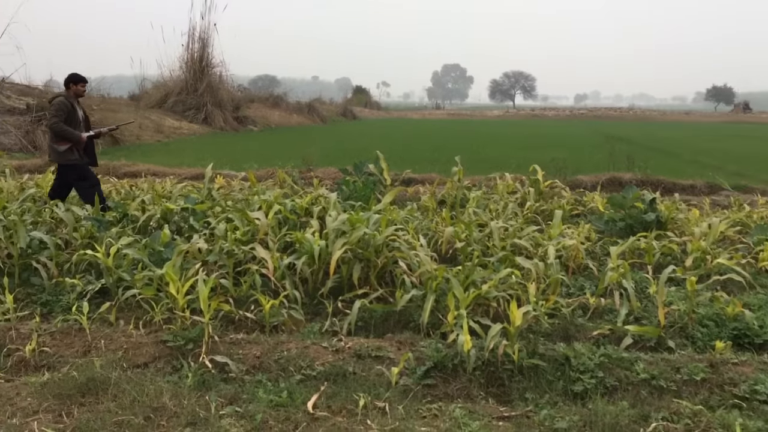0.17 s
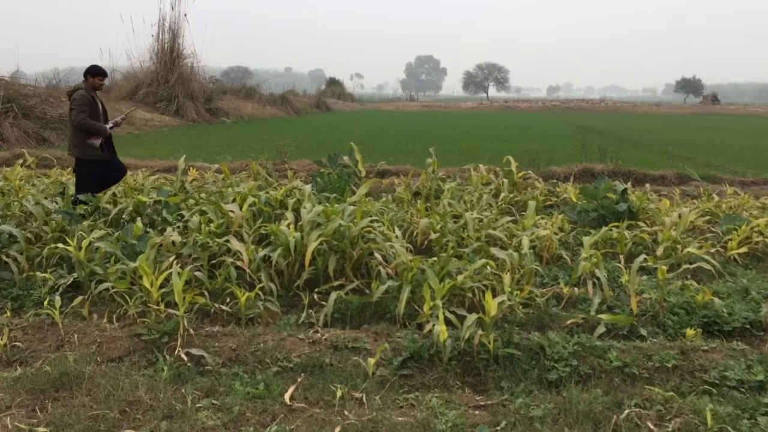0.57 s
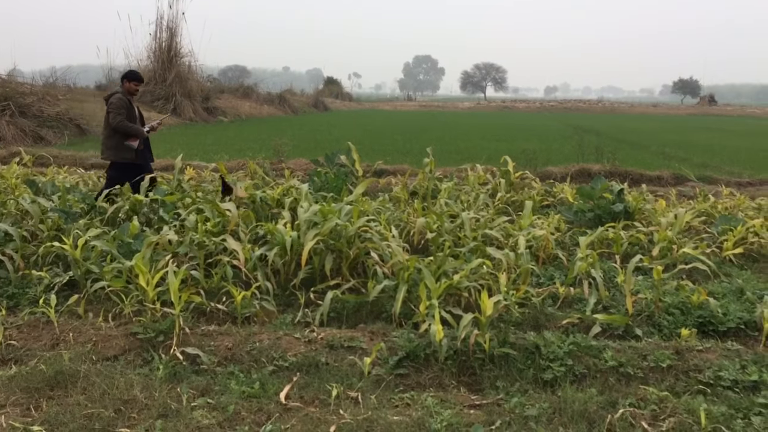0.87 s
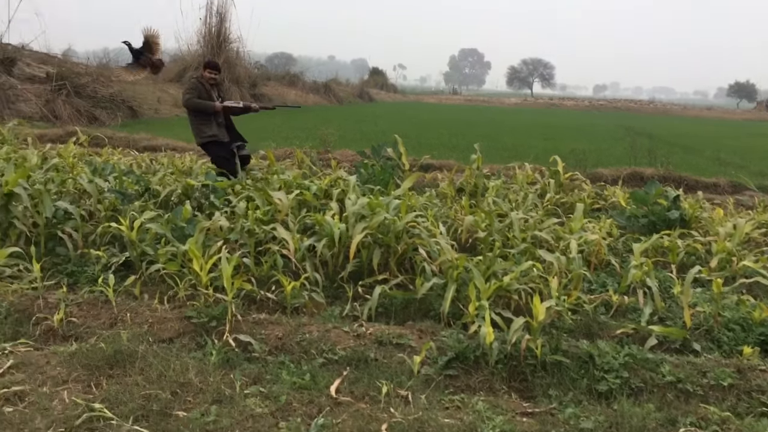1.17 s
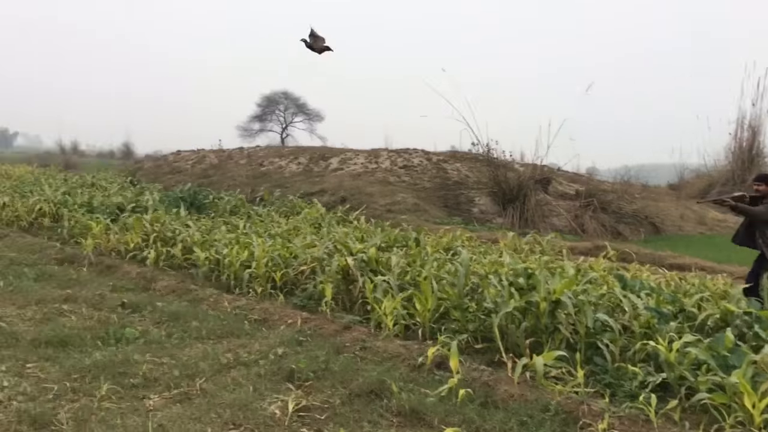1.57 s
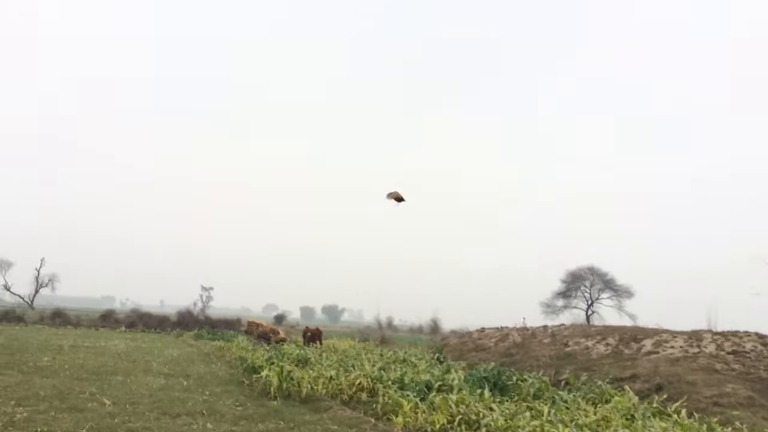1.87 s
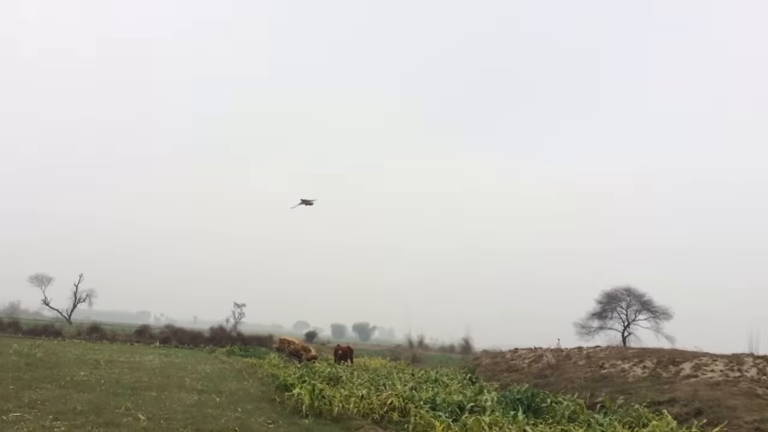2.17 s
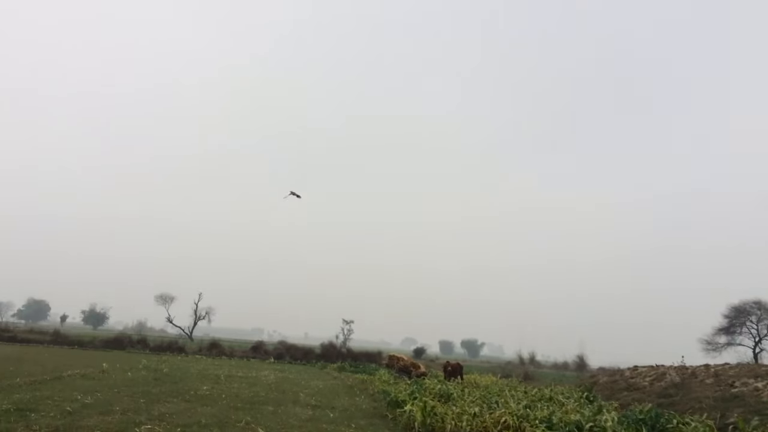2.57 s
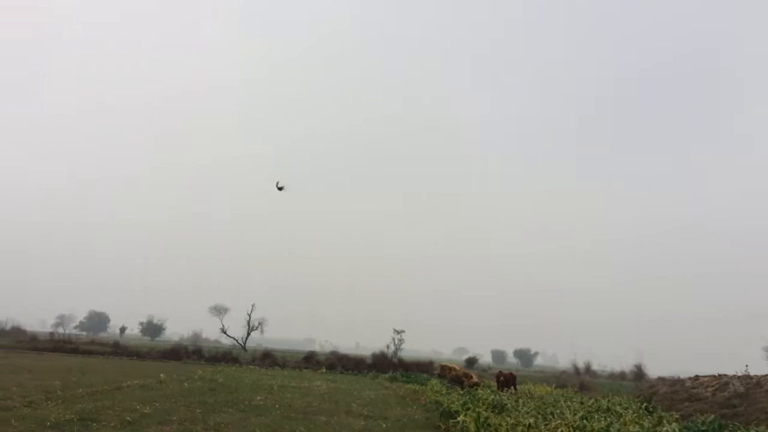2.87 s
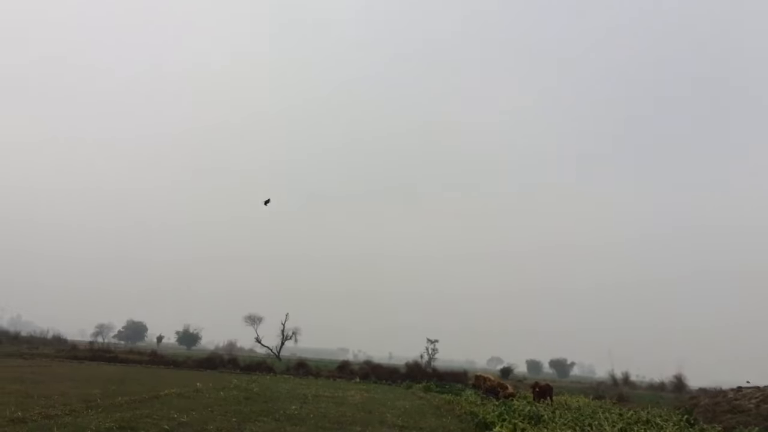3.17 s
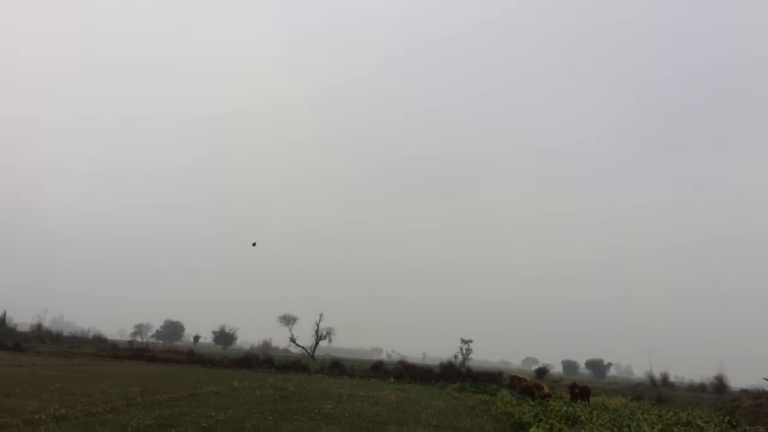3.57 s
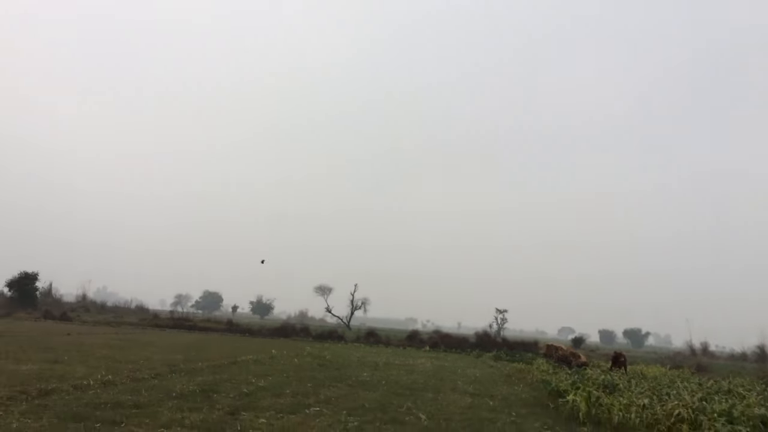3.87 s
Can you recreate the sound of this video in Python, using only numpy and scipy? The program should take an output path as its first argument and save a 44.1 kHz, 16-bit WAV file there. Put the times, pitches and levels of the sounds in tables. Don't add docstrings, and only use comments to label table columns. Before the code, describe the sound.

A single shotgun blast with a low, rolling echo over open farmland, after leaf rustle, snapping stalks and a bird's fast fluttering take-off; debris patters down afterwards. Single-channel handheld microphone, close to the crop.

```python
import sys
import numpy as np
from scipy import signal
from scipy.fft import rfft, irfft, next_fast_len
from scipy.io import wavfile
from scipy.ndimage import uniform_filter1d, map_coordinates

SR = 44100
rng = np.random.default_rng(int(sys.argv[2]) if len(sys.argv) > 2 else 0)


def file_out(sig):
    cols = np.atleast_2d(sig).T
    lim = np.clip(cols, -1, 1)
    pcm = np.round(lim * 32767).astype(np.int16)
    wavfile.write(sys.argv[1], SR, pcm)


def to_linear_factor(level_db):
    exponent = np.asarray(level_db, float) / 20
    return 10 ** exponent


N = 176400
TIME = np.arange(N) / SR
SHOT_S = 2.906

# freq_hz, level_db
NEAR_COLOUR = [(24, -69.5), (40, -32.5), (159, -14.5), (312, -6), (516, -1.5), (1850, -2.5), (2380, -6),
               (14500, -17), (16000, -36.5)]
# freq_hz, fade_s
NEAR_FADE = [(60, .12), (400, 0.81), (750, 0.26), (5000, 0.25), (14000, 0.23)]
# freq_hz, level_db
FAR_COLOUR = [(290, -41), (500, -16.5), (1670, -15.5), (7310, -18), (14000, -34.5), (16000, -60.5)]
# freq_hz, level_db
ROLL_COLOUR = [(35, -54), (60, -16.5), (183, -1.5), (446, -14.5), (538, -28), (1200, -44.5), (1560, -71),
               (2640, -120)]
# freq_hz, level_db
DEEP_COLOUR = [(50, -29), (85, -4), (130, -3.5), (220, -9), (400, -30), (900, -91)]
# start_s, peak_db, pitch_hz
PEALS = [(3.003, -15.5, 211), (3.017, -17.5, 303), (3.076, -14.5, 378), (3.175, -14.5, 193),
         (3.19, -20.5, 190), (3.232, -22.5, 231), (3.282, -26, 227), (3.372, -23.5, 171), (3.391, -25, 187),
         (3.405, -27.5, 180), (3.546, -21, 168.7), (3.625, -28.5, 140), (3.648, -35.5, 116),
         (3.904, -28, 153), (3.922, -26, 130)]
# freq_hz, level_db
SLAP_COLOUR = [(1000, -17.5), (6500, 4.5), (15500, -9.0)]
# freq_hz, level_db
LATE_COLOUR = [(1500, -15.5), (5000, 2.5), (15500, -15.5)]
# start_s, peak_db, pitch_hz
LEAD_BUMP = [
    (2.898, -16, 60),
]
# freq_hz, width_hz, level_db
LEAD_RING = [(1550, 350, -1), (2840, 200, 1.5), (350, 680, 3)]

# start_s, peak_db, pitch_hz
NEAR_BEATS = [(0.922, -37, 760), (0.982, -34.5, 770), (.989, -34.5, 690), (1.039, -34.5, 770),
              (1.045, -31.5, 595), (1.101, -32, 526), (1.105, -39.5, 740), (1.113, -41, 600),
              (1.158, -32.5, 670), (1.219, -29.5, 550), (1.279, -38, 810), (1.333, -34, 910),
              (1.34, -33.5, 588), (1.399, -29, 697), (1.459, -40.5, 676), (1.525, -44.5, 590),
              (1.626, -46.5, 585), (1.715, -46.5, 520), (1.779, -46.5, 560), (1.842, -54, 640),
              (1.907, -47, 597), (1.971, -52.5, 560)]
# start_s, peak_db
FAR_BEATS = [
    (2.094, -64),
    (2.232, -61),
    (2.305, -54),
    (2.373, -51.5),
    (2.442, -60),
    (2.504, -65),
    (2.562, -66),
    (2.641, -68),
]
# freq_hz, level_db
FLAP_COLOUR = [(90, -17), (180, 7.5), (320, -7), (700, 3.5), (2000, -5.5), (5000, -62.0)]
# start_s, peak_db, pitch_hz
THUMPS = [
    (0.932, -34.5, 77.5),
    (1.052, -34.5, 72),
    (1.16, -38, 80),
    (1.25, -37, 50),
    (1.301, -40, 63),
]
# start_s, peak_db, pitch_hz
KNOCKS = [(0.613, -37.5, 173), (0.874, -39, 175), (0.938, -33, 146), (1.024, -34, 173), (1.036, -34, 166),
          (1.045, -32, 160), (1.084, -41.5, 170), (1.115, -40, 169), (1.173, -39, 137), (1.198, -41, 130),
          (1.229, -30, 178), (1.253, -32, 169), (1.386, -36.5, 181)]

# time_s, level_db
WADING = [(0, -57), (.075, -56), (.11, -67.5), (.3, -61.5), (.5, -66.5), (.62, -62.5), (.84, -60.5),
          (.9, -53), (1.15, -56), (1.32, -53), (1.42, -51), (1.46, -56.5), (1.6, -57), (1.97, -59.5),
          (2.02, -66), (2.3, -73), (2.859, -79.5)]
# freq_hz, level_db
LEAF_COLOUR = [(120, -29.5), (200, -9), (322, -4), (635, -2.5), (709, -2.5), (3190, -4), (14300, -15),
               (16000, -15.5)]
# start_s, level_db, length_s
BRUSHES = [(0.2215, -43.5, 0.02), (0.598, -38.5, 0.03), (0.638, -42.5, 0.034), (0.7035, -37.5, 0.014),
           (0.861, -33.5, 0.02), (.876, -31.5, .035), (0.9426, -26, 0.04), (1.008, -36, .008),
           (1.018, -27.5, 0.018), (1.188, -30.5, 0.016), (1.2285, -21.5, 0.028), (1.27, -36, .025),
           (1.331, -30.5, 0.084), (1.377, -36, 0.05)]
# freq_hz, level_db
BRUSH_COLOUR = [(300, 0.5), (1000, -3.5), (2000, 0.5), (2700, -7), (3500, -2), (4800, -7.5), (15500, -17.5)]
# start_s, level_db, length_s
DEBRIS = [(3.304, -38.5, 0.036), (3.3518, -29, 0.071), (3.388, -25.5, 0.027), (3.414, -34.5, 0.0094),
          (3.441, -39, 0.039), (3.489, -33, 0.022), (3.541, -46, 0.024), (3.588, -39.5, 0.02),
          (3.62, -33, 0.012), (3.692, -50.5, 0.025), (3.73, -52, 0.019), (3.7764, -50, 0.02)]
# freq_hz, level_db
DEBRIS_COLOUR = [(500, -22), (1800, 2.5), (4500, -2.5), (9000, -17.5), (15500, -40)]
# start_s, level_db, length_s
HUSKS = [(3.357, -41, 0.02), (3.44, -42, 0.024), (3.485, -44, .02), (3.57, -38.5, 0.023),
         (3.582, -38.5, .02), (3.61, -44, .01), (3.7764, -34, .02), (3.8, -56, 0.13), (3.884, -44, .015),
         (3.902, -50, 0.019), (3.922, -43, 0.04), (3.955, -46.5, 0.013), (3.972, -45, 0.014)]
# freq_hz, level_db
HUSK_COLOUR = [(500, -7.5), (1100, -3), (1900, 1.5), (2700, -3), (5000, -19), (15500, -47.5)]
# start_s, peak_db, ring_hz
SNAPS = [(0.3147, -32, 2150), (0.6759, -36, 1930), (.676, -41, 794), (0.8773, -37, 1860),
         (.9382, -30.5, 2120), (.9546, -29.5, 1440), (1.0215, -34, 1430), (1.0399, -29, 1610),
         (1.196, -30.5, 2050), (1.2346, -17, 1770), (1.645, -38, 1900), (3.362, -47, 1860),
         (3.3925, -23, 1700), (3.3925, -24.5, 785), (3.401, -25, 2850), (3.4087, -22, 1740),
         (3.4087, -26.5, 847), (3.496, -30.5, 2010), (3.503, -38.5, 1490), (3.589, -35.5, 890),
         (3.5932, -32, 1820), (3.612, -44.5, 1250), (3.7777, -36, 2390), (3.782, -40, 1400),
         (3.9265, -40.5, 1680), (3.96, -40, 1790), (3.959, -42.5, 1000)]
# start_s, peak_db, ring_hz
TICKS = [(.613, -32.5, 330), (1.1335, -36, 7160), (1.6496, -30.5, 2680), (1.649, -32, 1450),
         (2.7562, -53.5, 4220), (3.1082, -18.5, 2400), (3.1082, -35, 4530), (3.1082, -39, 6400),
         (3.1082, -36, 12070), (3.6262, -37, 2756), (3.6262, -42, 4600), (1.2348, -31, 3570)]

# start_s, length_s, level_db
CAWS = [
    (.38, .26, -62),
    (2.17, .31, -70),
    (3.62, .18, -62),
]
# freq_hz, width_hz, level_db
PUMP_BODY = [(67, 30, -1), (108, 84, -0.5)]
# freq_hz, level_db
AIR_COLOUR = [(35, -29), (70, -1), (150, -10), (300, -23), (800, -32.5), (1900, -33), (3000, -39.5),
              (15500, -47)]


def unit(x):
    return x / np.sqrt(np.mean(x ** 2) + 1e-20)


def along(points, hz):
    f, v = np.transpose(points)
    return np.interp(np.log(hz + 1), np.log(f + 1), v)


def wobble(rate):
    knots = rng.standard_normal(int(N * rate / SR) + 4)
    return map_coordinates(knots, [TIME * rate])


def filtered(x, response):
    m = next_fast_len(len(x) + 8192)
    return irfft(rfft(x, m) * response(np.fft.rfftfreq(m, 1 / SR)), m)[:len(x)]


def noise(colour, grain_db=0, rate=900):
    raw = rng.standard_normal(N) * to_linear_factor(grain_db * wobble(rate))
    return unit(filtered(raw, lambda hz: to_linear_factor(along(colour, hz))))


def resonances(peaks):
    return lambda f: sum(to_linear_factor(db) * 1j * f * w / (c * c - f * f + 1j * f * w) for c, w, db in peaks)


def puffs(rows, width_s, lag_s, sag=0.033, rise=1):
    out = np.zeros(N)
    for (s, db, hz), width, lag in zip(rows, width_s, lag_s):
        t = TIME - s - lag
        near = np.abs(t) < 5 * width
        u = t[near]
        swell = np.exp(-.5 * (u / width / np.where(u < 0, rise, 1)) ** 2)
        turns = hz * u * (1 - sag * u / width / 5)
        out[near] += to_linear_factor(db) * swell * np.cos(2 * np.pi * turns + rng.uniform(0, 2 * np.pi))
    return out


def bursts(rows, rise_s):
    out = np.zeros(N)
    for s, db, length in rows:
        t = TIME - s
        out += to_linear_factor(db) * np.clip(t / rise_s, 0, 1) * np.exp(-(t / length) ** 2)
    return out


def since_shot():
    return np.maximum(TIME - SHOT_S, 0)


def muzzle_push():
    u = since_shot() / 0.00039
    return -to_linear_factor(4) * (TIME >= SHOT_S) * (1 - u / 2) * np.exp(-u / 2) * np.minimum(u * 4, 1)


def near_echoes():
    hold_s = 0.027
    hz, frames, z = signal.stft(noise(NEAR_COLOUR, grain_db=1, rate=1500), SR, nperseg=256)
    fading_s = np.maximum(frames - SHOT_S - hold_s, 0)
    z = z * to_linear_factor(-60 * fading_s / along(NEAR_FADE, hz)[:, None])
    echoes = signal.istft(z, SR, nperseg=256)[1][:N]
    rise = np.clip((TIME - SHOT_S - .0006) / 0.0011, 0, 1)
    return to_linear_factor(-9.5 + 0.29 * wobble(43)) * echoes * rise


def low_roll():
    late = since_shot()
    level_db = -24.5 - 60 * late / 1.92 + 2 * np.tanh(wobble(35))
    roll = np.minimum(late / 0.026, 1) * to_linear_factor(level_db) * noise(ROLL_COLOUR)
    deep = np.minimum(late / .2, 1) * to_linear_factor(-33.5 - 60 * late / 3.8) * noise(DEEP_COLOUR)
    widths = [0.67 / hz for s, db, hz in PEALS]
    lags = [1.0 / hz for s, db, hz in PEALS]
    return roll + deep + puffs(PEALS, widths, lags)


def bank_slap():
    length_s = 0.018
    slaps = bursts([(3.017, 0, length_s), (3.071, -16.5, length_s)], rise_s=.003)
    return to_linear_factor(-23.5) * slaps * noise(SLAP_COLOUR, grain_db=5.0)


def far_tail():
    t = TIME - SHOT_S
    level_db = -44 - 60 * since_shot() / 1.76 + 1.5 * wobble(38)
    tail = (t >= 0) * to_linear_factor(level_db) * noise(FAR_COLOUR, grain_db=2.0)
    swell = np.exp(-.5 * ((t - .31) / 0.016) ** 2)
    return tail + to_linear_factor(-49.5) * swell * noise(LATE_COLOUR, grain_db=3.5)


def lead_in():
    t = TIME - SHOT_S
    ahead = (t < 0) * np.clip(1 + t / .022, 0, 1)
    ring = unit(filtered(rng.standard_normal(N), lambda f: resonances(LEAD_RING)(f) * (f < 3800)))
    hiss = to_linear_factor(-38.5) * (ahead > 0) * noise(NEAR_COLOUR)
    return to_linear_factor(-22.5) * ahead * ring + hiss + puffs(LEAD_BUMP, [.003], [0])


def shot():
    echoes = filtered(near_echoes() + low_roll(), lambda f: (1j * f / (60 + 1j * f)) ** 6)
    return muzzle_push() + echoes + bank_slap() + far_tail() + lead_in()


def wings():
    beats = list(NEAR_BEATS) + [(s, db, 560) for s, db in FAR_BEATS]
    count = len(beats)
    claps = puffs(beats, [0.0024] * count, [0.00254] * count, sag=0.18, rise=0.69)
    swell = sum(to_linear_factor(db) * np.exp(-.5 * ((TIME - s - .004) / .006) ** 2) for s, db, hz in beats)
    whoosh = to_linear_factor(-19.5) * noise(LEAF_COLOUR, grain_db=6.5)
    flap = to_linear_factor(-12) * noise(FLAP_COLOUR, grain_db=1.5, rate=250)
    return claps + swell * (whoosh + flap)


def air_pushes():
    low = list(THUMPS) + list(KNOCKS)
    widths = [0.65 / hz for s, db, hz in THUMPS] + [0.54 / hz for s, db, hz in KNOCKS]
    return puffs(low, widths, [0.685 / hz for s, db, hz in low])


def leaves():
    s, db = np.transpose(WADING)
    level_db = np.interp(TIME, s, db) + 5 + 1.4 * np.tanh(wobble(23.0))
    out = to_linear_factor(level_db) * noise(LEAF_COLOUR, grain_db=2.0)
    kinds = ((BRUSHES, BRUSH_COLOUR, 0.0054), (DEBRIS, DEBRIS_COLOUR, 0.0062), (HUSKS, HUSK_COLOUR, 0.0062))
    for rows, colour, rise_s in kinds:
        rub = noise(colour, grain_db=2.5, rate=450) * to_linear_factor(1.8 * wobble(90))
        out += to_linear_factor(-11) * bursts(rows, rise_s) * rub
    return out


def stalks():
    out = np.zeros(N)
    t = TIME[:SR // 40]
    for s, db, hz in list(SNAPS) + list(TICKS):
        drift = np.cumsum(rng.normal(0, 0.051, len(t)))
        ring = to_linear_factor(-60 * t / 0.0096) * np.sin(2 * np.pi * hz * t + drift)
        dull = uniform_filter1d(uniform_filter1d(rng.standard_normal(len(t)), size=4), size=3)
        crack = to_linear_factor(-0.8 - 60 * t / 0.0056) * dull
        out[round(s * SR):][:len(t)] += to_linear_factor(db) * np.minimum(t * 4000, 1) * (ring + crack)
    return out


def pump():
    first_s, period_s, exhaust_s = .024, .12, 0.034
    exhaust_db, scatter_db = -6.5, 1.5
    blows = np.zeros(N)
    for k, (a, b, c, d) in enumerate(np.tanh(rng.standard_normal((40, 4)))):
        s = first_s + k * period_s
        firing = (s + 0.0097 * a, scatter_db * b)
        exhaust = (s + exhaust_s + 0.015 * c, exhaust_db + scatter_db * d)
        for at, db in (firing, exhaust):
            blows[min(abs(round(at * SR)), N - 1)] = to_linear_factor(db)
    thuds = filtered(blows, lambda f: resonances(PUMP_BODY)(f) ** 2 / (1 + 1j * f / 116) ** 3)
    return to_linear_factor(-39 - 16) * unit(thuds)


def crow():
    hoarse = rng.standard_normal(N) * (1 + 0.13 * np.sin(2 * np.pi * 70 * TIME))

    def throat(hz):
        peaks = [(hz, 210, 0), (2150, 900, -15)]
        return unit(filtered(hoarse, lambda f: resonances(peaks)(f) ** 2))

    low, high = throat(1800), throat(1800 + 110)
    out = np.zeros(N)
    for s, length, db in CAWS:
        arch = np.sin(np.pi * np.clip((TIME - s) / length, 0, 1))
        out += to_linear_factor(db) * np.minimum(2 * arch, 1) * (arch * high + (1 - arch) * low)
    return out


def field_air():
    duck_db = -4 * (TIME > SHOT_S) * np.exp(-since_shot() / 3)
    return to_linear_factor(duck_db) * to_linear_factor(-57 + 0.53 * wobble(7.7)) * noise(AIR_COLOUR)


def scene():
    bird = wings() + air_pushes()
    plot = leaves() + stalks()
    return (shot() + bird + plot + pump() + crow() + field_air())[None]


def top_cut(x):
    return signal.sosfilt(signal.butter(12, 16440, fs=SR, output="sos"), x)


def record(dry):
    ceiling = .97
    soft = dry[0] / (1 + np.abs(dry[0] / ceiling) ** 8) ** (1 / 8)

    def microphone(f):
        return (f < 15900) * to_linear_factor(-2 * np.exp(-((f - 2645) / 430) ** 2))

    return top_cut(filtered(soft, microphone)[None])


dry = scene()
out = record(dry)
file_out(out)
```